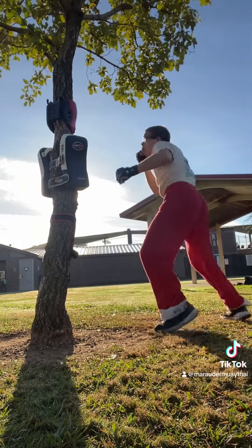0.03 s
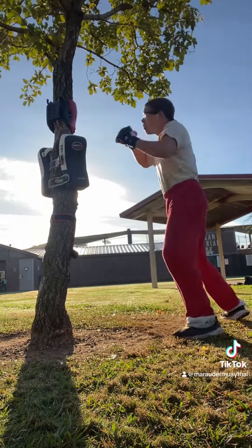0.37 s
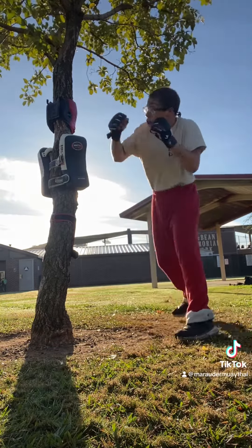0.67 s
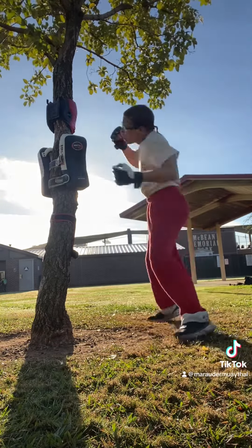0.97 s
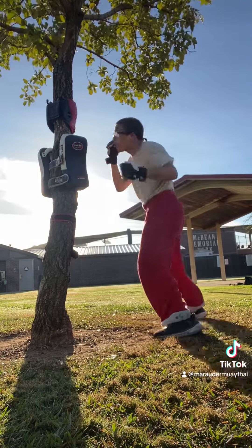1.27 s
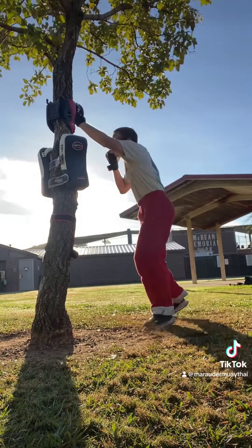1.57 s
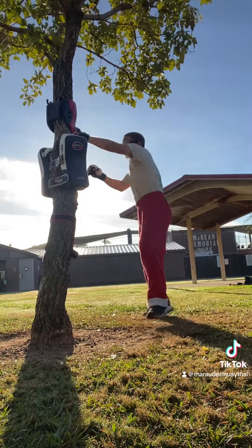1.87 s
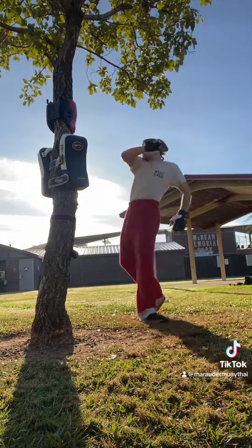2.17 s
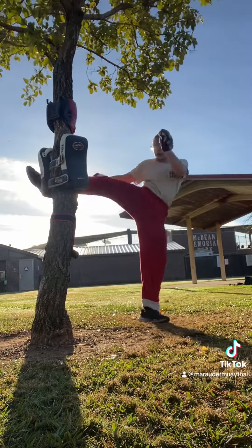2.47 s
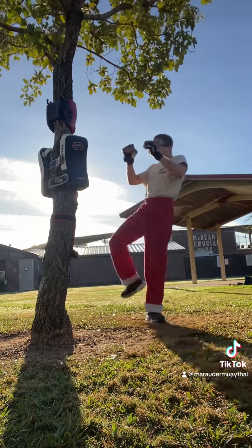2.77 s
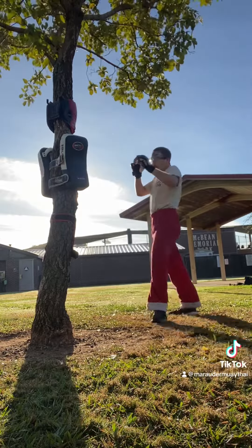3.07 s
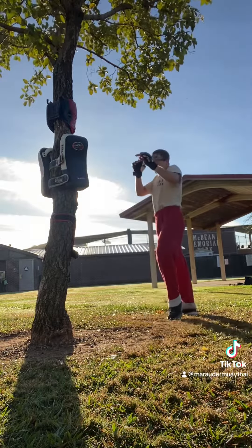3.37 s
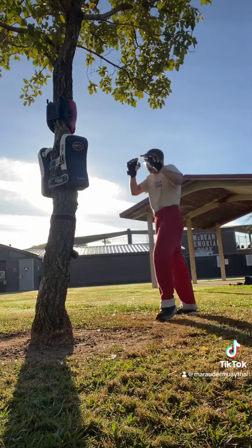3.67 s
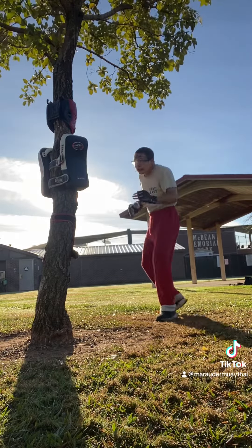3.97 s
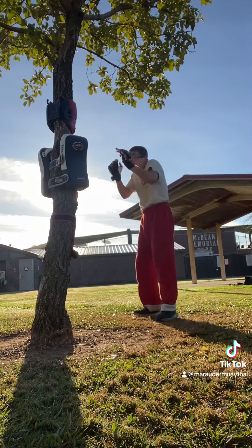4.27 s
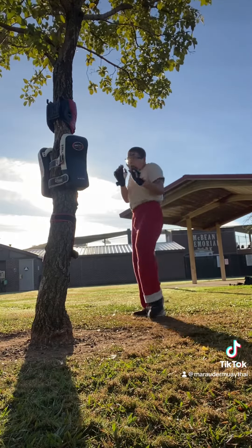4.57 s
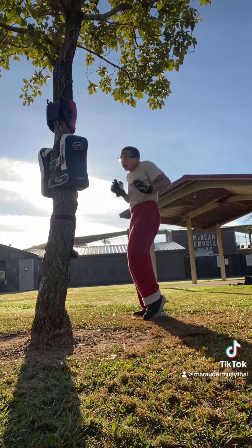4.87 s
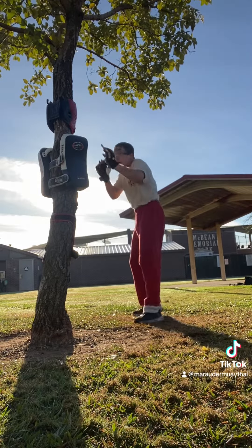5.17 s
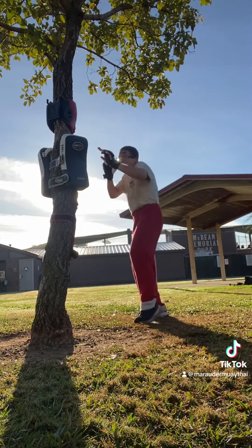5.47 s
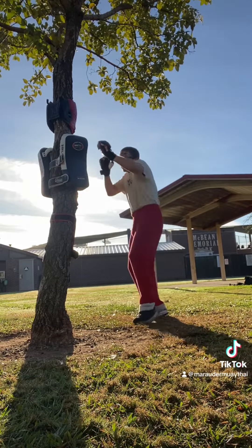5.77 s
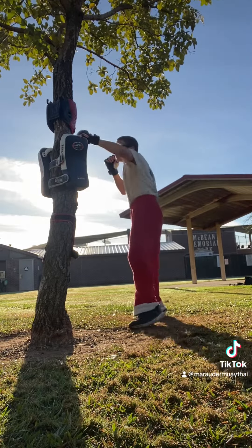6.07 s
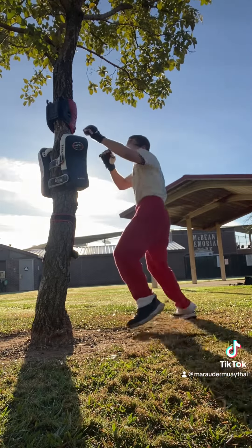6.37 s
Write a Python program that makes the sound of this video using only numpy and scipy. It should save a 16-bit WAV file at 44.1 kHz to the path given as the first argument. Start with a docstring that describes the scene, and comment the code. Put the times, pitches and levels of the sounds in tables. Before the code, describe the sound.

A punch and a heavier kick smack vinyl pads on a tree among soft taps, while a far engine hums behind.

```python
"""Boxing on a tree in a park

A boxer gives foam pads strapped to a tree a few light glove taps, one hard punch and one kick.
Each blow slaps the vinyl cover; firmer ones thump the foam and make the leaves shiver, and some
rattle the pad on the bark. Trouser cloth swishes with the kick, and buildings return a faint echo.
Behind it all are traffic rumble, a distant engine and a thin high whistle."""
import sys
import numpy as np
from scipy import signal
from scipy.fft import rfft, irfft
from scipy.io import wavfile
from scipy.ndimage import uniform_filter1d

SR = 44100
rng = np.random.default_rng(int(sys.argv[2]) if len(sys.argv) > 2 else 0)


def unload_wav(signal):
    """Save mono or channel-first audio to the path in sys.argv[1] as 16-bit WAV at rate SR, clipped to [-1, 1]."""
    wavfile.write(
        sys.argv[1],
        SR,
        np.round(np.clip(np.atleast_2d(signal).T, -1, 1) * 32767).astype(np.int16),
    )


N = 292338
TIME = np.arange(N) / SR


def gain(db):
    """Turn decibels into a number to multiply by."""
    return 10 ** (np.asarray(db) / 20)


def unit(x):
    """Scale a sound so that its average strength (rms) is 1."""
    return x / np.sqrt(np.mean(x ** 2))


def curves(table):
    """Join a table's rows by straight lines in time, one curve for each column after the first."""
    times, *columns = np.transpose(table)
    return [np.interp(TIME, times, column) for column in columns]


def value_at(points, hz):
    """Read between (Hz, value) points, with every octave equally wide."""
    point_hz, values = np.transpose(points)
    return np.interp(np.log(hz + 1e-3), np.log(point_hz), values)


def colour(x, points):
    """Make each frequency louder or softer, following (Hz, dB) points."""
    size = x.shape[-1]
    return irfft(rfft(x) * gain(value_at(points, np.fft.rfftfreq(size, 1 / SR))), size)


def resonate(x, hz, width_hz):
    """Let a sound ring around one frequency."""
    return signal.lfilter(*signal.iirpeak(hz, max(hz / width_hz, .3), fs=SR), x)


def drift(per_s):
    """Wander smoothly at random, by about 1 either way."""
    hold = int(SR / per_s)
    steps = np.repeat(rng.standard_normal(N // hold + 1), hold)
    return 1.3 * uniform_filter1d(uniform_filter1d(steps, hold), hold)[:N]


def swell(top_s, db_per_s):
    """A level in dB that climbs to 0 at top_s and stays there."""
    return -db_per_s * np.maximum(top_s - TIME, 0)


def place(x, pan_db):
    """Put a sound to one side. Pan is how many dB louder the left is than the right."""
    return np.array([x * gain(pan_db / 2), x * gain(-pan_db / 2)])


def add(out, start_s, x):
    """Mix a stereo sound in at its start time."""
    i = int(start_s * SR)
    out[:, i:i + x.shape[1]] += x[:, :N - i]


# How alike the two sides are. Each row: frequency in Hz, likeness (1 is the same, -1 is opposite).
SIDE_LIKENESS = [(60, 1), (110, 0.95), (220, 0.86), (420, 0.36), (800, -0.34), (1530, 0.9), (2930, 0.92),
                 (5600, 0.85)]
# Which side is louder. Each row: frequency in Hz, pan in dB.
SIDE_BALANCE = [(60, -0.5), (99, 2.5), (160, 2.5), (270, 2), (450, -1), (750, -2.5), (1230, 2), (2040, 2),
                (3380, 3), (5600, 1)]
def scattered_noise(points, left_lag_samples=3):
    """Noise from many directions; how alike the two sides hear it depends on the wavelength."""
    hz = np.fft.rfftfreq(N, 1 / SR)
    shared, apart = rfft(rng.standard_normal((2, N)))
    likeness = np.clip(value_at(SIDE_LIKENESS, hz), -.99, .99)
    sign = np.array([[1], [-1]])
    spectra = shared * np.sqrt(1 + likeness) + sign * apart * np.sqrt(1 - likeness)
    spectra *= gain(sign * value_at(SIDE_BALANCE, hz) / 2)
    left, right = colour(irfft(spectra, N), points)
    return unit(np.array([np.roll(left, left_lag_samples), right]))


# The low rumble of far roads. Each row: frequency in Hz, level in dB.
ROAD_RUMBLE = [(15, -40.5), (28, -26.5), (38, -22.5), (52, -5.5), (70, -2), (100, 0.5), (135, -2),
               (180, -2), (230, -8.5), (310, -10.5), (420, -13.5), (520, -21), (700, -31), (1500, -89)]
# The hiss of tyres. Each row: frequency in Hz, level in dB.
TYRE_HISS = [(300, -25), (620, -12.5), (780, -8), (1050, -7), (1500, -7), (2500, -3), (2950, -3.5),
             (3500, -13.5), (4400, -11), (5200, -13.5), (5900, -31.5), (7000, -34.5), (11000, -45),
             (13000, -57)]
def traffic(nearest_s=4.6, throb_db=1.0, flutter_db=.25, dull_hz=290, dull_db_per_s=0.67):
    """Far traffic draws nearer: a restless rumble that slowly grows duller, under smooth tyre hiss."""
    rumble_db = -37 + swell(nearest_s, db_per_s=0.73) + throb_db * drift(14)
    hiss_db = -53 + swell(nearest_s, db_per_s=0.88) + flutter_db * drift(6)
    rumble = scattered_noise(ROAD_RUMBLE)
    deep = signal.sosfiltfilt(signal.butter(2, dull_hz, fs=SR, output="sos"), rumble)
    upper = (rumble - deep) * gain(-dull_db_per_s * (TIME - TIME.mean()))
    return (deep + upper) * gain(rumble_db) + scattered_noise(TYRE_HISS) * gain(hiss_db)


# The engine pulls and eases off, twice. Each row: time in seconds, firings per second.
FIRING_RATE = [(.2, 97), (1.1, 101), (1.7, 108), (2.03, 106), (2.3, 95), (2.95, 95.5), (3.9, 102),
               (6.22, 132), (6.62, 110.6)]
# Brief dips in its lowest note. Each row: time in seconds, depth in dB, half length in seconds.
ENGINE_DIPS = [(1.48, 8, .07), (4.138, 14, 0.066), (5.02, 10.5, 0.081), (5.377, 5, 0.046)]
# Its higher notes. Each row: multiple of the firing rate, starting level in dB, fall in dB per second.
ENGINE_OVERTONES = [(2, -55, -0.1), (4, -53, 5)]
def engine(waver_db=0.87, load_db_per_hz=0.07, pipe_hz=191.6, pipe_width_hz=5.3, wall_delay_s=.053):
    """A far exhaust drones, louder as it nears and speeds up, and beats with its echo off a wall."""
    hz, = curves(FIRING_RATE)
    phase = 2 * np.pi * np.cumsum(hz) / SR + .06 * drift(15)
    near_db = -37.5 + swell(top_s=1.72, db_per_s=8.5)
    load_db = load_db_per_hz * (hz - hz.mean())
    dips_db = sum(depth * np.exp(-((TIME - s) / half_s) ** 2) for s, depth, half_s in ENGINE_DIPS)
    drone = gain(near_db + load_db - dips_db + waver_db * drift(9)) * np.sin(phase)
    for multiple, db, fall_db_per_s in ENGINE_OVERTONES:
        # the exhaust pipe booms when an overtone meets the pipe's own note
        boom_db = 8.5 / (1 + (2 * (multiple * hz - pipe_hz) / pipe_width_hz) ** 2)
        level_db = db + boom_db - fall_db_per_s * TIME + waver_db * drift(6.5)
        drone += gain(level_db) * np.sin(multiple * (phase + .18 * drift(25)))
    wall_echo = gain(-18.5) * np.interp(TIME - wall_delay_s, TIME, drone)
    return place(np.sqrt(2) * (drone + wall_echo), pan_db=2)


# The whistle winds up, then sags and fades. Each row: time in seconds, pitch in Hz, level in dB.
WHISTLE_PATH = [(.72, 4560, -80), (.9, 4610, -66.5), (1.12, 4700, -69), (1.33, 4750, -78),
                (1.45, 4776, -67), (1.68, 4778, -60), (1.92, 4782, -69), (2.02, 4788, -66),
                (2.35, 4675, -75), (3.0, 4670, -73), (3.3, 4660, -95)]
def whistle(unsteady_hz=3, waver_db=1.3):
    """A thin, slightly unsteady whistle far away, perhaps the engine's turbocharger."""
    hz, db = curves(WHISTLE_PATH)
    tone = np.sin(2 * np.pi * np.cumsum(hz + unsteady_hz * drift(120)) / SR)
    return place(unit(tone) * gain(db + waver_db * drift(30)), pan_db=1.5)


# The tone of the park's echo. Each row: frequency in Hz, level in dB.
ECHO_TONE = [(150, -32.5), (500, 2), (1000, -3), (2500, -5), (5000, -5), (9000, -3)]
def park_echo(x, fade_60_db_s=0.96, build_s=0.05, echo_db=-17):
    """Sound scatters back from the ground, a shelter roof and walls."""
    t = TIME[:SR]
    shape = (1 - np.exp(-t / build_s)) * gain(-60 * t / fade_60_db_s)
    reflections = colour(rng.standard_normal((2, SR)), ECHO_TONE) * shape
    return gain(echo_db) * signal.fftconvolve(x, unit(reflections) / np.sqrt(SR), axes=1)[:, :N]


def rustle(points, uneven_db, width, pan_db):
    """Countless tiny ticks of uneven size, spread between left and right."""
    def ticks():
        return unit(colour(rng.standard_normal(N) * gain(uneven_db * rng.standard_normal(N)), points))
    shared, apart = ticks(), width * ticks()
    left = (shared + apart) * gain(pan_db / 2)
    right = (shared - apart) * gain(-pan_db / 2)
    return np.array([left, right]) / np.hypot(1, width)


# The treetop shivers. Each row: start in seconds, level in dB, swell and fade times in seconds.
LEAF_SHIVERS = [(.44, -57.5, 0.07, 0.12), (1.01, -53.5, 0.044, 0.12), (2.396, -45.5, 0.036, 0.11)]
# The tone of the leaves. Each row: frequency in Hz, level in dB.
LEAF_TONE = [(500, -3), (1000, -6), (1400, -5.5), (2200, -.5), (4200, 0), (5200, -15.5), (6300, -20),
             (7500, -33), (11000, -46), (13000, -50)]
def leaves():
    """A jolt runs up the trunk and the leaves tick against each other."""
    shake = 0
    for start_s, db, swell_s, fade_s in LEAF_SHIVERS:
        t = np.maximum(TIME - start_s, 0)
        shape = (1 - np.exp(-t / swell_s)) * np.exp(-t / fade_s)
        shake = shake + gain(db) * shape / shape.max()
    return shake * rustle(LEAF_TONE, uneven_db=6, width=0.62, pan_db=2)


# The tone of trouser cloth. Each row: frequency in Hz, level in dB.
CLOTH_TONE = [(600, -23.5), (1500, -4), (3800, 5), (5200, -4.5), (6800, -15), (8200, -16), (11000, -32),
              (13000, -32)]
def trouser_swish(landing_s=2.386, db=-43, rise_s=0.0083, fade_s=0.092):
    """Loose cloth swishes ever faster as the leg whips in, then flaps out against the pad."""
    speed = np.exp(-np.maximum((landing_s - TIME) / rise_s, (TIME - landing_s) / fade_s))
    return gain(db) * speed * rustle(CLOTH_TONE, uneven_db=7, width=0.55, pan_db=0)


# The pad rattles after a blow. Each row: start in seconds, starting level in dB, length in seconds.
PAD_RATTLES = [(.174, -48, .04), (1.005, -41, .09), (2.396, -33, .18)]
def pad_rattles(low_hz=1400, high_hz=4500, cycles=2.2, fade_db=15, scatter_db=3, count=14):
    """The shaken pad and its straps catch on the bark: dry ticks that thin out and weaken."""
    out, t = np.zeros((2, N)), TIME[:SR // 50]
    for start_s, db, length_s in PAD_RATTLES:
        for k, (slip, pitch, size, side) in enumerate(rng.random((count, 4))):
            progress = ((k + slip) / count) ** 1.5
            hz = low_hz * (high_hz / low_hz) ** np.sqrt(pitch)
            age = 2 * hz * t / cycles
            tick = age * np.exp(1 - age) * np.sin(2 * np.pi * hz * t)
            tick_db = db - fade_db * progress + scatter_db * (2 * size - 1)
            add(out, start_s + progress * length_s, place(tick * gain(tick_db), pan_db=7 * side))
    return out


# A firm blow squeezes the foam, a hard one shoves the pad against the trunk, and after the kick # a foot or leg
# knocks softly. Each row: start in seconds, level in dB, first pitch in Hz, # pitch it heads for in Hz (before
# sinking), settling time in seconds, swell time in seconds.
FOAM_THUMPS = [(0.433, -41, 687, 382, 0.0018, 0.0039), (1.0002, -26.5, 640, 300, 0.003, 0.005),
               (1.0032, -11, 759, 112.2, 0.0015, 0.0099), (1.0113, -21, 62.1, 57.8, 0.018, 0.0099),
               (2.3819, -5, 480, 73.2, 0.0033, 0.0046), (2.3909, -7, 161, 30, .02, 0.0069),
               (2.528, -27, 334, 148.5, 0.0033, 0.0062)]
# The notes of the pad's body. Each row: pitch in Hz, width in Hz, level in dB.
PAD_NOTES = [(300, 29, -9), (378, 61, 0)]
def foam_thumps(damping=1.11, sink_per_s=5, top_hz=455):
    """The foam booms, sinking in pitch as the limb's weight joins and stifles it; the pad knocks."""
    booms, t = np.zeros((2, N)), TIME[:SR // 5]
    for start_s, db, first_hz, settled_hz, settle_s, swell_s in FOAM_THUMPS:
        hz = settled_hz + (first_hz - settled_hz) * np.exp(-t / settle_s)
        hz *= np.exp(-sink_per_s * t)
        shape = t / swell_s * np.exp((1 - (t / swell_s) ** damping) / damping)
        tone = np.sin(2 * np.pi * np.cumsum(hz) / SR)
        add(booms, start_s, place(gain(db) * shape * tone, pan_db=2))
    knocks = sum(gain(db) * resonate(booms, hz, width_hz) for hz, width_hz, db in PAD_NOTES)
    return signal.sosfilt(signal.butter(6, top_hz, fs=SR, output="sos"), booms + knocks)


# Slaps on the cover, and two soft scuffs after the punch. Each row: start in seconds, level in dB,
# tone centre in Hz, contact time in seconds, pan in dB, how early it grazes in seconds, crack level
# in dB relative to the row's level, tuning as a ratio, tone width as a multiple of the centre.
SLAPS_AND_SCUFFS = [(0.1642, -39.5, 997, 0.00072, 3, .001, -14, 1.03, .75),
                    (0.186, -55, 2800, .002, 2, .001, -9.5, 1.05, 1.5),
                    (0.4303, -43, 904, 0.0046, 5, 0.0032, -10.5, 0.95, 1.4),
                    (0.7145, -52, 890, 0.0053, -1, .001, -31, .97, .8),
                    (0.9999, -29, 1970, 0.0016, 4.5, 0.001865, -10.5, 0.97, 1.7),
                    (1.412, -49.5, 1790, 0.014, 1.5, 0.00085, -37.5, 0.95, 2.4),
                    (1.457, -48.5, 854, 0.022, 0, .0033, -34, 0.91, 1.5),
                    (2.0647, -44, 2320, 0.00067, 2, 0.004, -31.5, 1.03, .6),
                    (2.3871, -24.5, 1323, 0.0017, 3.5, .0075, -9.5, 0.97, 1.4),
                    (2.454, -51, 2550, .001, 3, .001, -22, 1.36, .4),
                    (6.088, -54.5, 750, 0.0055, 2.5, .001, -24, 0.8, 1.1)]
def contacts(graze_hz=2140, graze_drag=0.23, rebound_s=0.0067, rebound_hz=3670, rebound_spread=0.47):
    """Each row makes three contacts: a graze, the landing and a rebound."""
    for start_s, db, hz, contact_s, pan_db, early_s, _, tuning, spread in SLAPS_AND_SCUFFS:
        drag_s = contact_s + graze_drag * early_s
        yield start_s - early_s, db - 9, graze_hz, drag_s, pan_db + 3, tuning, spread
        yield start_s, db, hz, contact_s, pan_db, tuning, spread
        yield start_s + rebound_s, db - 17, rebound_hz, contact_s, pan_db, tuning, rebound_spread


def hollow_pops(hz=690, pop_db=-11, delay_s=0.0013, swell_s=0.002):
    """Each blow or scuff gives a short, round, hollow pop just after it lands."""
    out, t = np.zeros((2, N)), TIME[:SR // 20]
    pop = t / swell_s * np.exp(1 - t / swell_s) * np.sin(2 * np.pi * hz * t)
    for start_s, db, _, _, pan_db, *_ in SLAPS_AND_SCUFFS:
        add(out, start_s + delay_s, place(gain(db + pop_db) * pop, pan_db))
    return out


# The tone of vinyl snapping tight. Each row: frequency in Hz, level in dB.
CRACK_TONE = [(1200, -12), (2800, -3), (4100, 0), (4700, -12), (5300, -19), (6000, -7), (7000, -30),
              (10000, -46), (12000, -42)]
def cover_cracks(crack_s=0.00053):
    """A blow that lands flat snaps the vinyl tight with a short bright crack."""
    out, t = np.zeros((2, N)), TIME[:SR // 100]
    for start_s, db, _, _, pan_db, _, crack_db, _, _ in SLAPS_AND_SCUFFS:
        burst = colour(rng.standard_normal(len(t)) * t * np.exp(-t / crack_s), CRACK_TONE)
        add(out, start_s - 1.5 * crack_s, place(unit(burst) * gain(db + crack_db), pan_db))
    return out


def sag(x, cycles):
    """Low notes come later than high ones, so a slap falls in pitch as the blow sinks in."""
    hz = np.fft.rfftfreq(len(x), 1 / SR)
    return irfft(rfft(x) * np.exp(-2j * np.pi * cycles * np.log(hz + 200)), len(x))


# The notes of the vinyl cover. Each row: pitch in Hz, width in Hz, level in dB.
COVER_NOTES = [(720, 260, 2), (984, 230, 2.5), (1200, 230, 3), (1987, 330, -1), (3010, 720, -8),
               (3950, 450, -7)]
def cover_slaps(crinkle=0.14, band_hz=(520, 4700), sag_cycles=1.5, buzz_db=-27, buzz_s=0.057):
    """Air trapped under a blow pops and the vinyl crinkles; both make the cover ring."""
    out, t = np.zeros((2, N)), TIME[:SR // 10]
    band = signal.butter(3, band_hz, "band", fs=SR, output="sos")
    for start_s, db, hz, contact_s, pan_db, tuning, spread in contacts():
        shape = np.exp(-t / contact_s) + gain(buzz_db) * np.exp(-t / buzz_s)
        push = crinkle * rng.standard_normal(len(t)) * shape
        push[0] += 1  # the pop of trapped air
        ring = sum(gain(note_db) * resonate(push, tuning * note_hz, width_hz)
                   for note_hz, width_hz, note_db in COVER_NOTES)
        # a flat, tight contact is bright, a cupped one hollow
        ring = resonate(resonate(ring, hz, spread * hz), hz, spread * hz)
        ring = signal.sosfilt(band, ring)  # little bass; dull above about 4.7 kHz, as the phone hears it
        slap = unit(sag(ring, sag_cycles)) * gain(db - 7.5)
        add(out, start_s - sag_cycles / hz, place(slap, pan_db))
    return out


# How the left side's wave is shifted. Each row: frequency in Hz, lead in radians (minus means late).
LEFT_LEAD = [(60, -0.14), (250, -0.5), (430, -0.33), (690, -0.5), (950, -0.9), (2500, 0.3), (4000, -1.9),
             (5200, -2.5), (6500, -1.5)]
def bend_round_phone(x):
    """Direct sound bends round the phone, and most of it reaches the left side slightly later."""
    shift = np.exp(1j * value_at(LEFT_LEAD, np.fft.rfftfreq(N, 1 / SR)))
    return np.array([irfft(rfft(x[0]) * shift, N), x[1]])


def scene():
    """The blows and their echo, in front of the park's background."""
    blows = cover_slaps() + hollow_pops() + cover_cracks() + foam_thumps() + pad_rattles()
    direct = bend_round_phone(blows + engine() + whistle())
    return direct + park_echo(blows) + trouser_swish() + leaves() + traffic()


def record(dry):
    """The phone weakens the deepest bass and cuts the highest treble."""
    bass_cut, top_hz = [(20, -18), (36, 0)], 12300  # the pairs are Hz and dB
    treble_cut = signal.ellip(8, .2, 70, top_hz, fs=SR, output="sos")
    return signal.sosfilt(treble_cut, colour(dry, bass_cut))


dry = scene()
out = record(dry)
unload_wav(out)
```